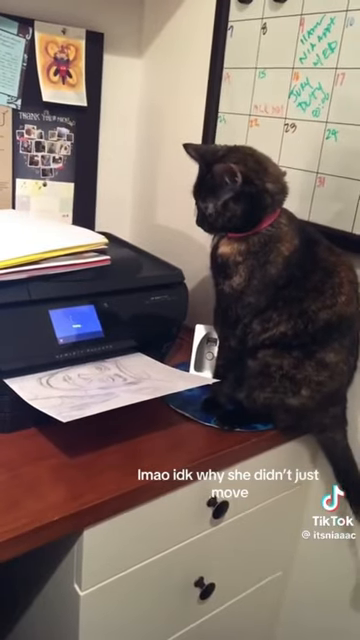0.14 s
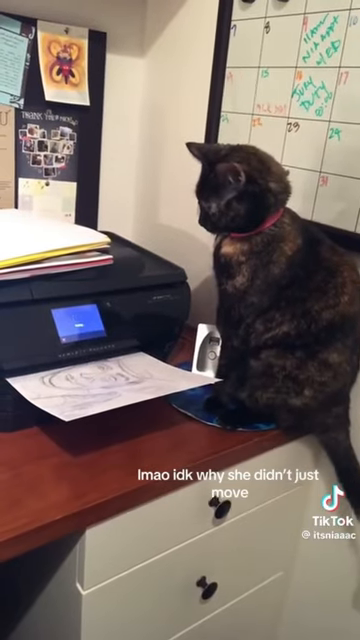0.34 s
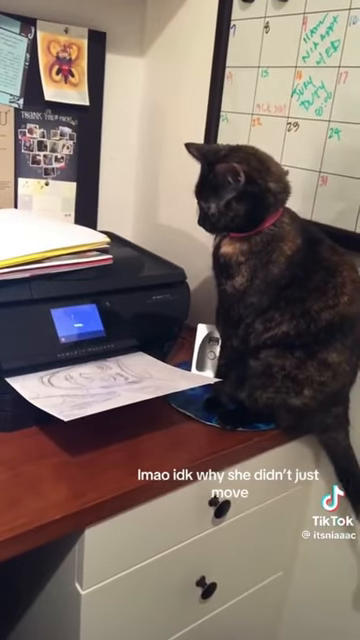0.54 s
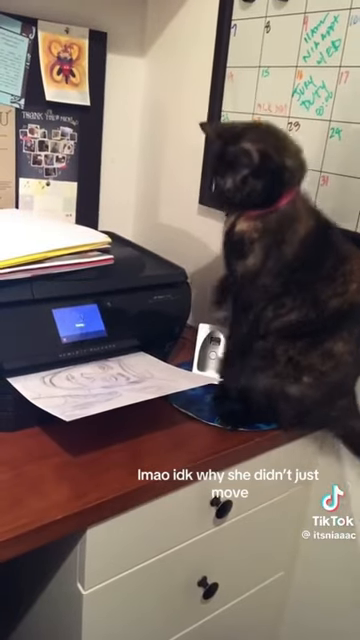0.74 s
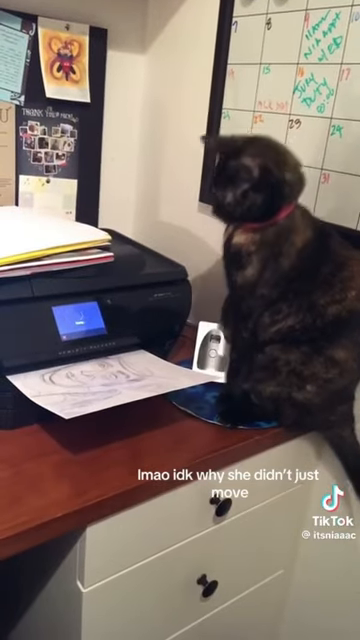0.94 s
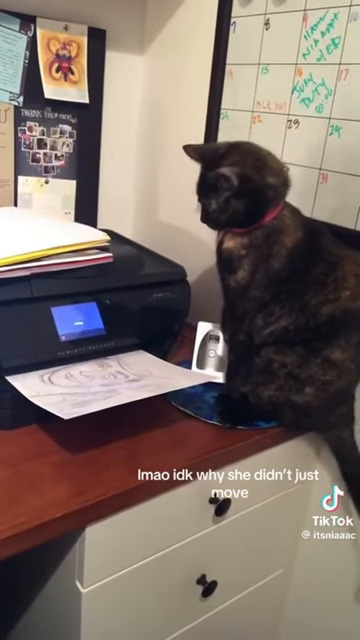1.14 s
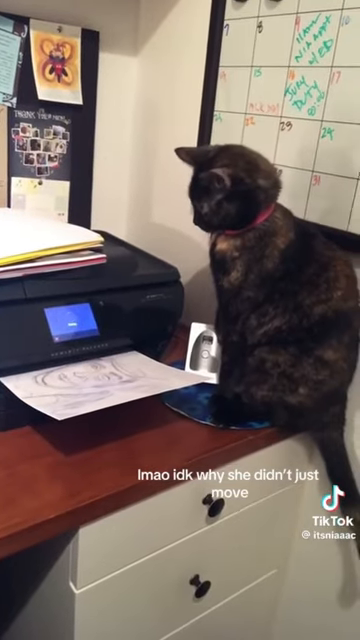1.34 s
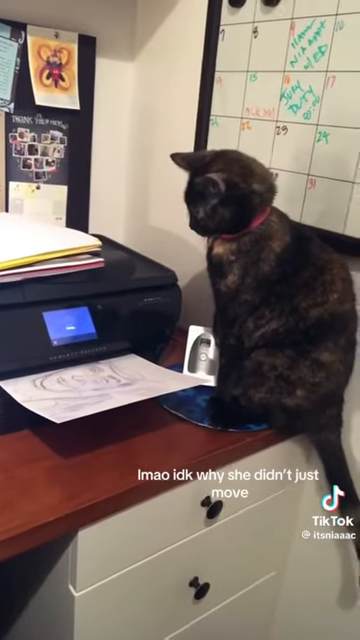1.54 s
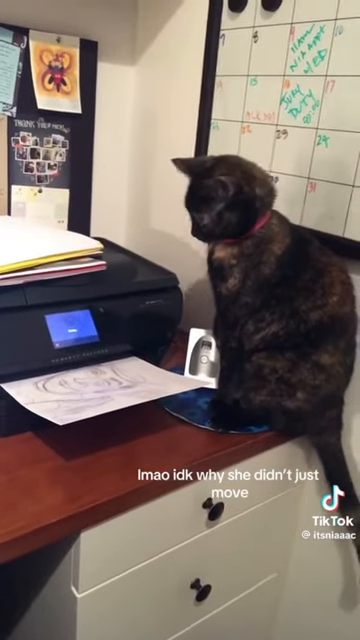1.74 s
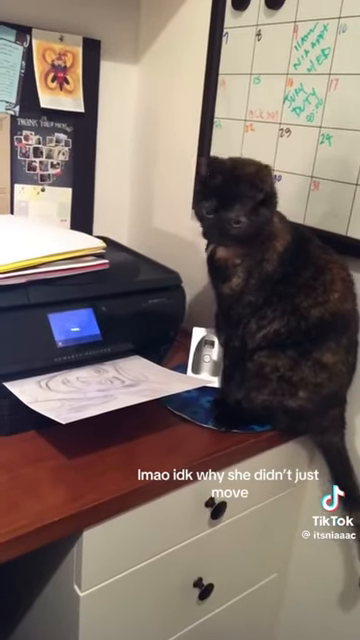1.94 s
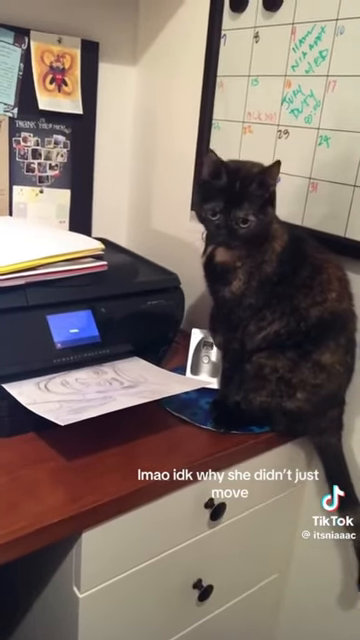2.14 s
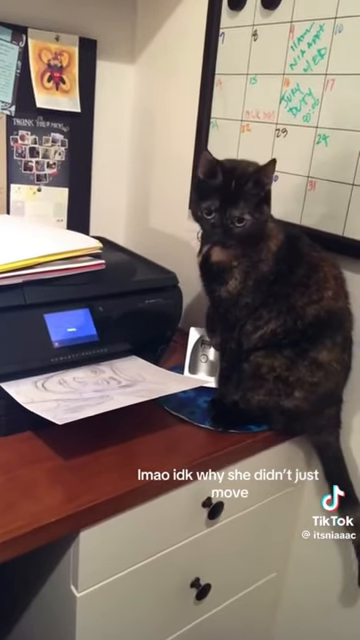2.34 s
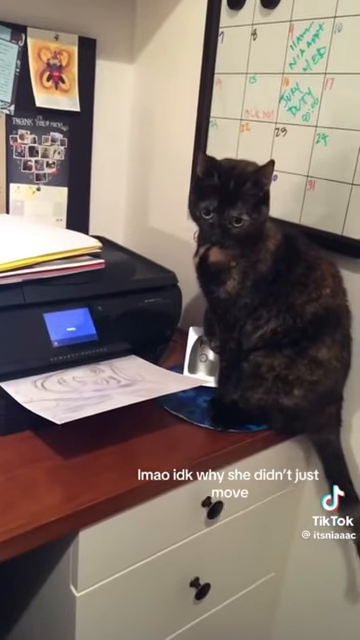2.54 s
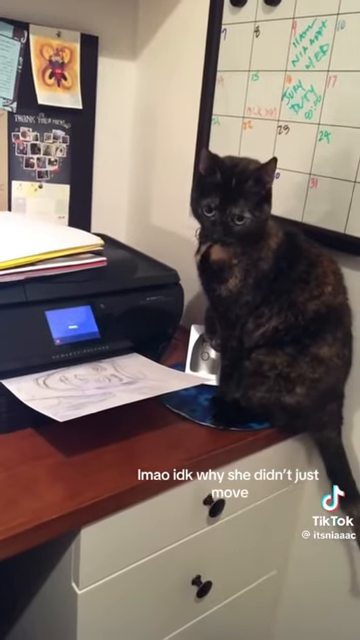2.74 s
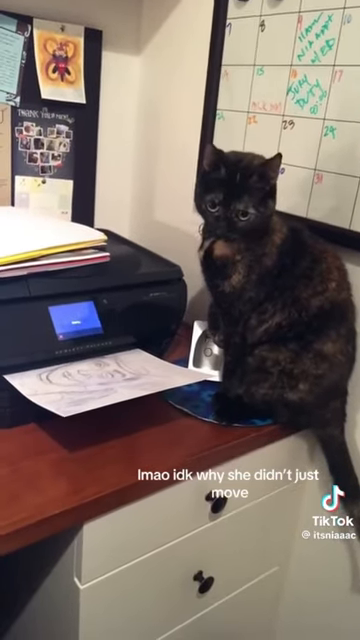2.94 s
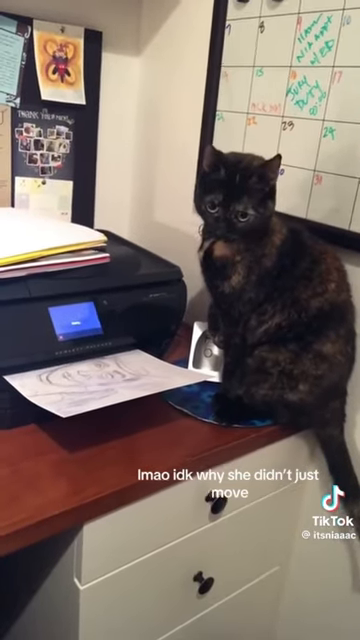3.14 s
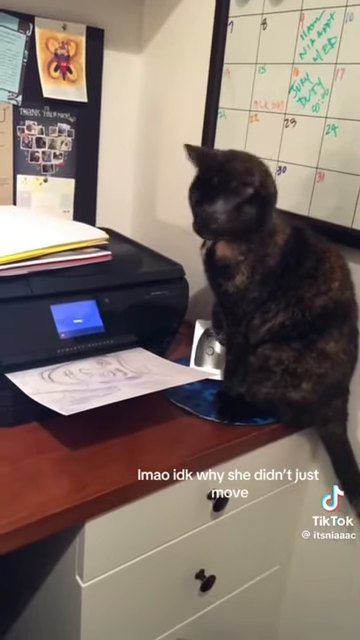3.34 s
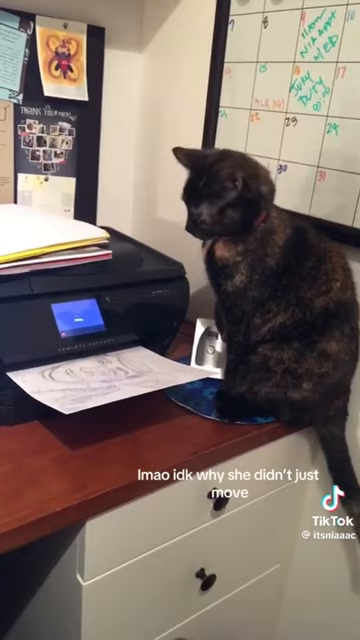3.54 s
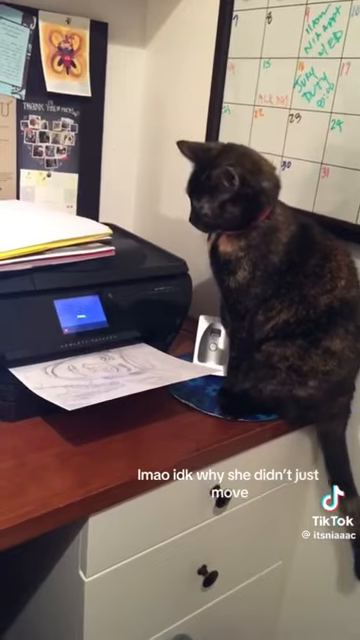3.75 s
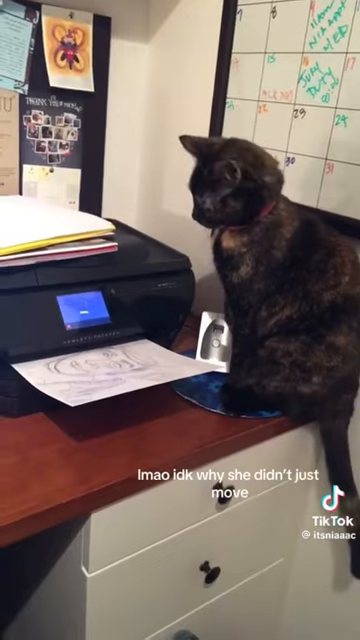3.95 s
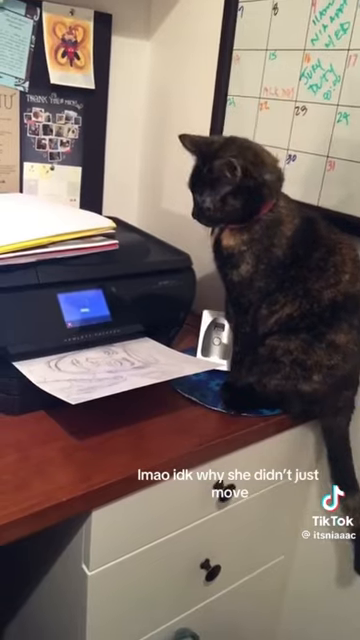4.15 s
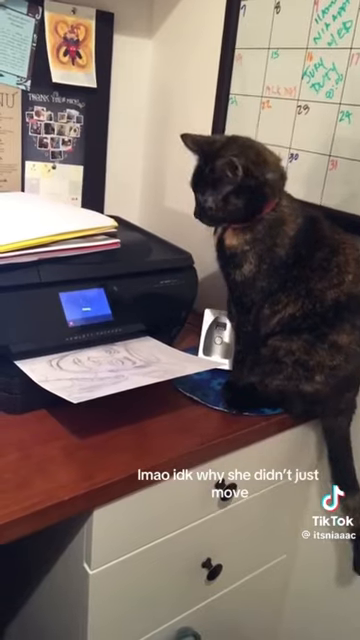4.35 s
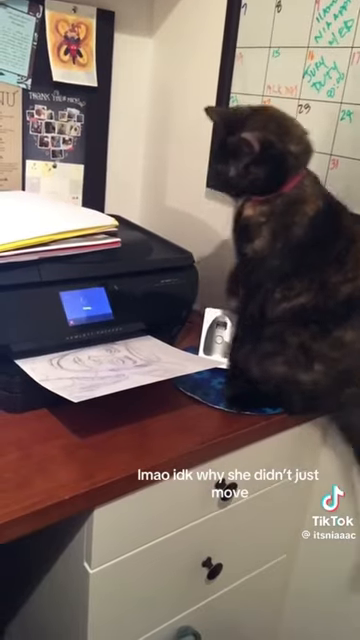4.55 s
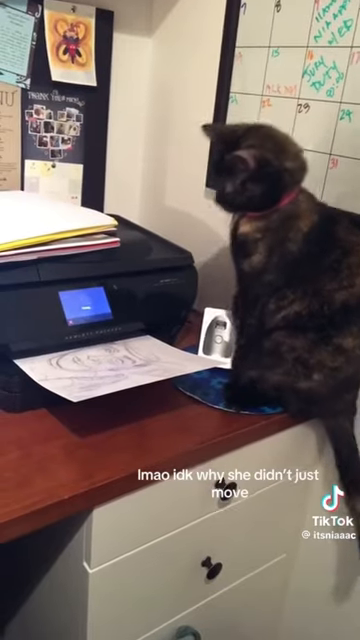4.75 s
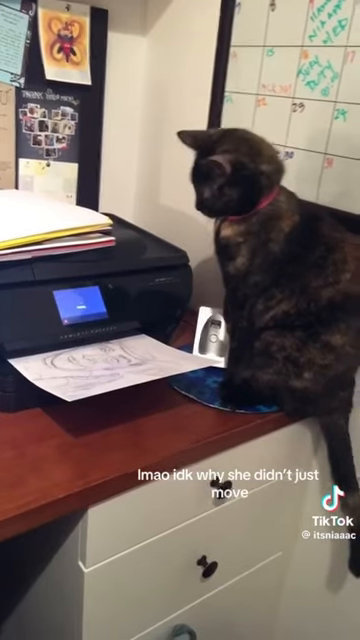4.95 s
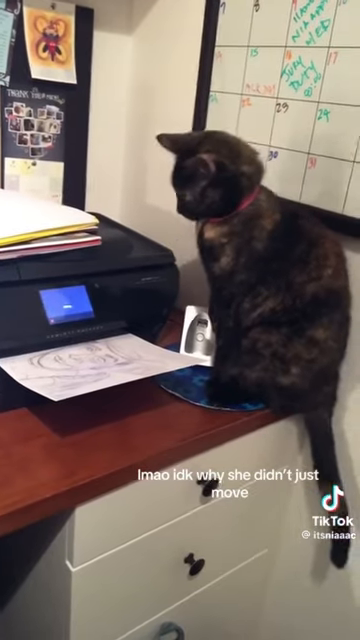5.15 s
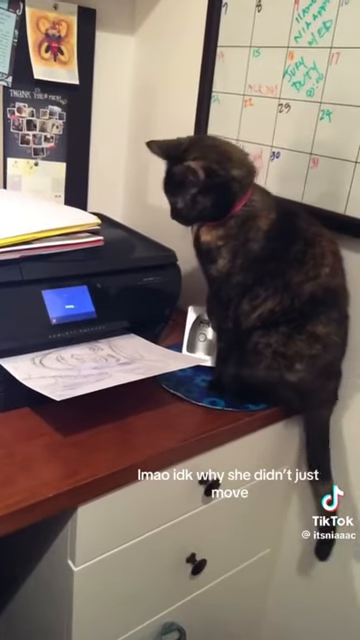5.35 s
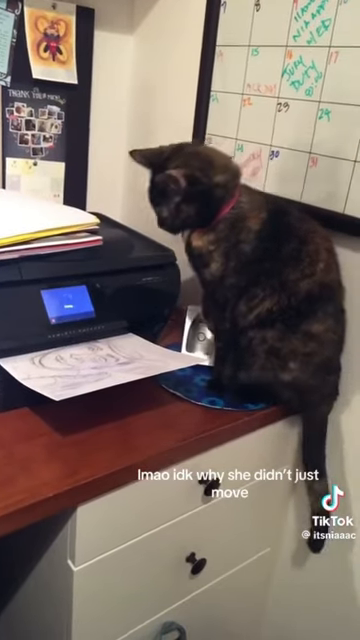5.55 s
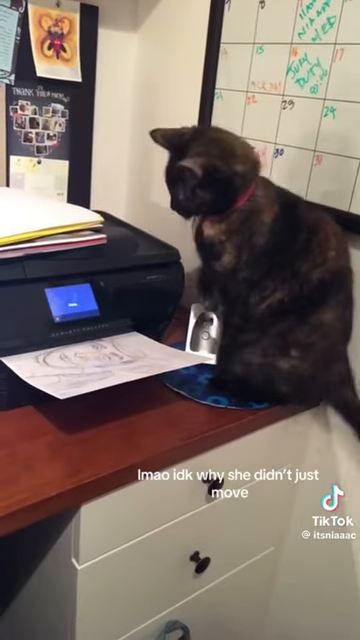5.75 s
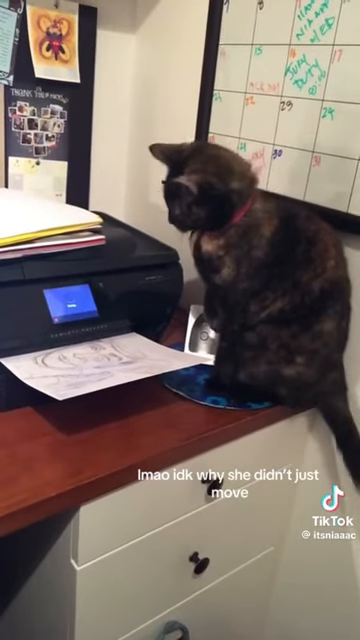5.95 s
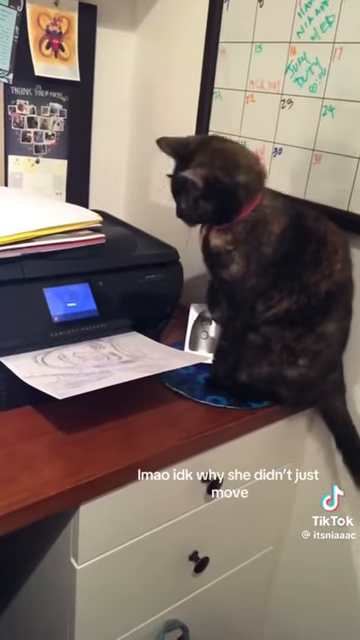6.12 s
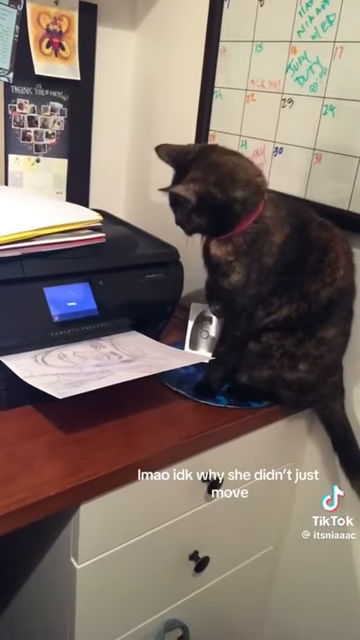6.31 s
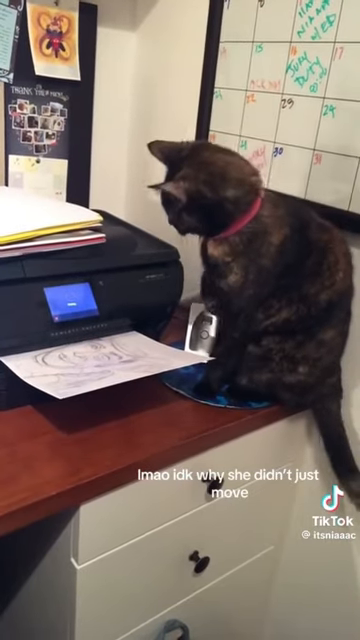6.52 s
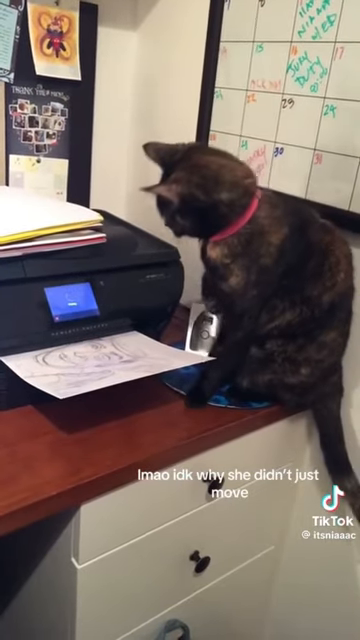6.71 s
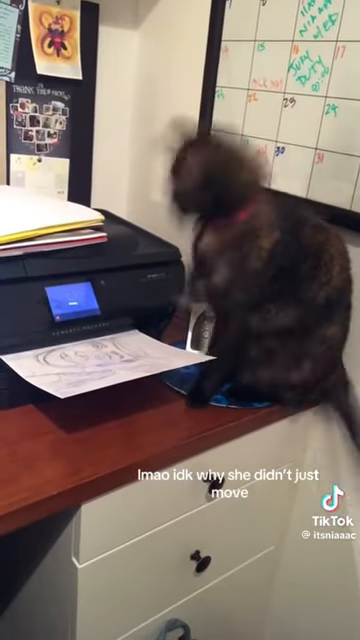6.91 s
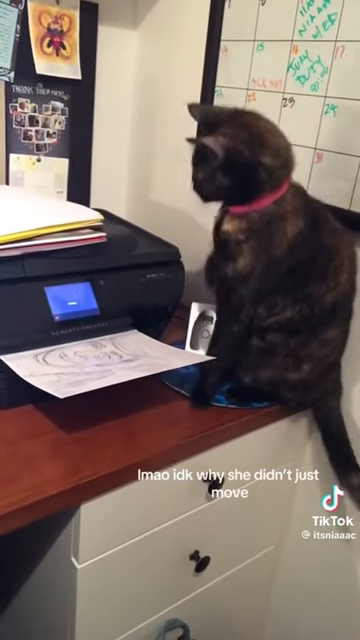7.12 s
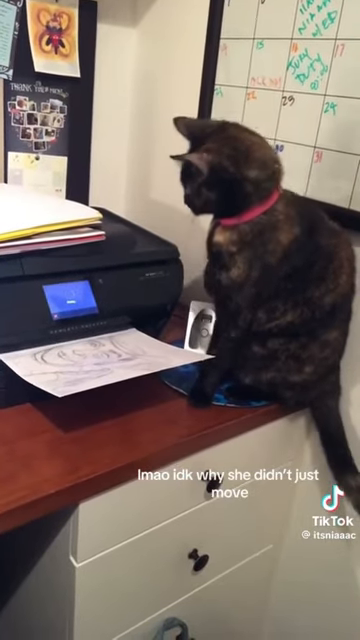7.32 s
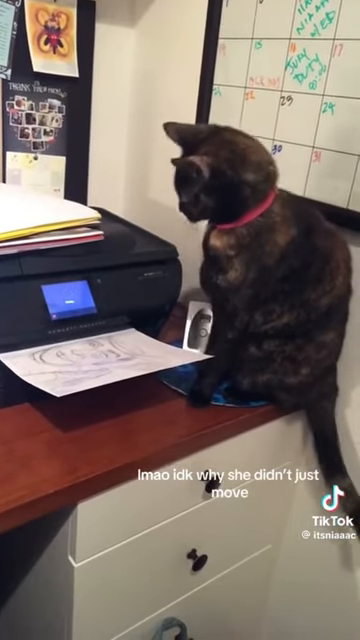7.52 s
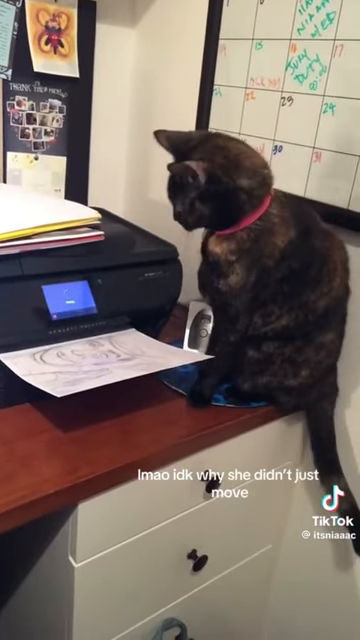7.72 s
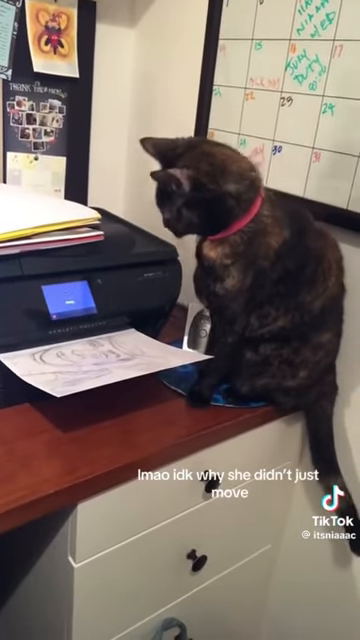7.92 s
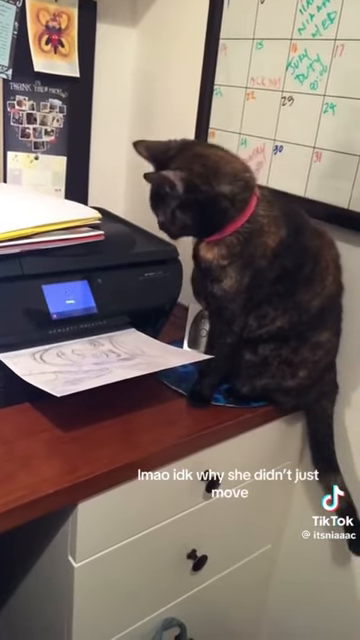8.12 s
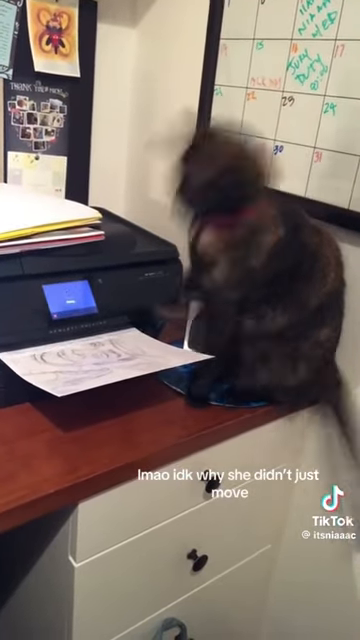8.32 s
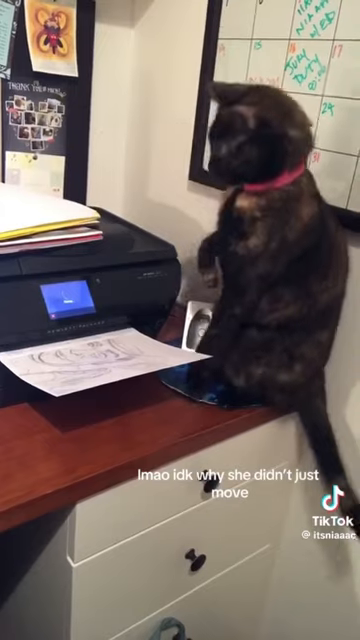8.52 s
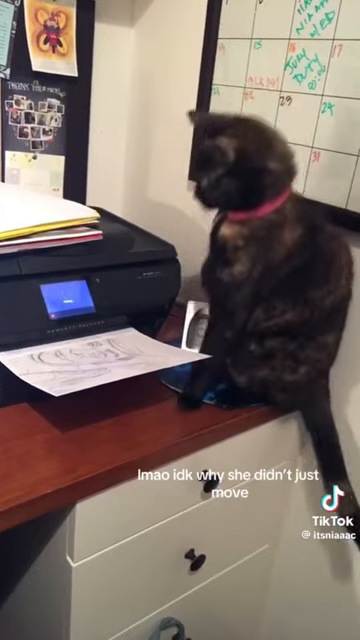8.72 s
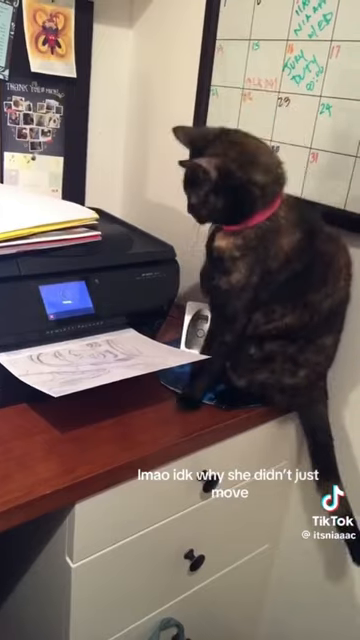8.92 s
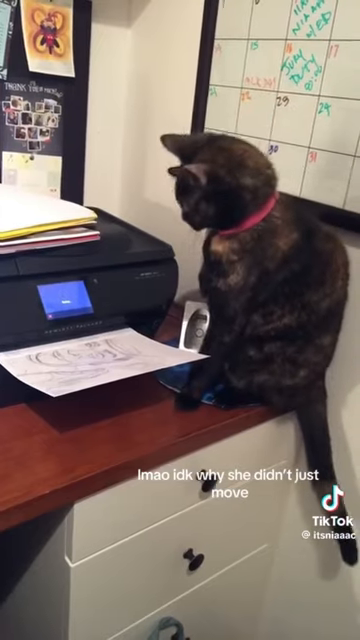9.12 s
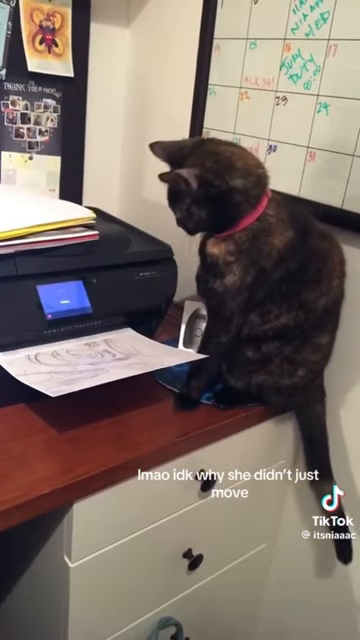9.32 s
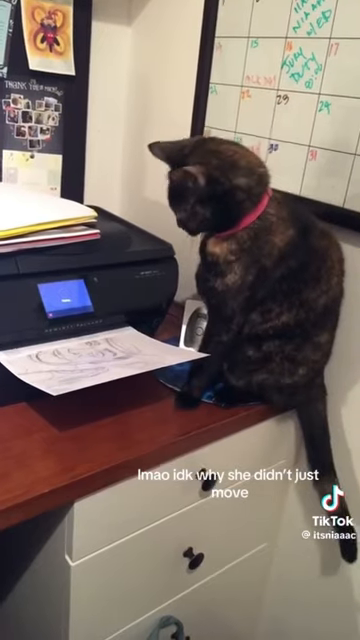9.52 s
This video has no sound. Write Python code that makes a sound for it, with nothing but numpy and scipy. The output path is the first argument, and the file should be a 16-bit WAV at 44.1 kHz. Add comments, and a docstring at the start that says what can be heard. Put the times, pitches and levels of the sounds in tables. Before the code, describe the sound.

Close, dry sound of an inkjet printer on a desk in a small room, with faint hiss and low hand rumble on the microphone. Quiet until a tiny tick at 0.55 s, then feeds begin at about 0.6, 1.9, 3.1, 4.4, 5.6, 6.8, 8.3 and 9.5 s. Each is a short, toothy gear rasp with a low plastic shudder, followed at once by a carriage sweep of roughly 0.3 s out and slightly less back: low rolling hum, rail hiss, thin motor whine stronger on the return, and a braking growl at each end. The desk booms most at 0.6, 4.4 and 8.3 s. Gritty scraping at 2.25-2.5 s ends in squeaks and a sharp click; a fainter scrape and squeak comes near 4.6 s. Barely audible, very high collar tinkles occur near 0.7, 4.5, 7 and 8.4 s, with soft bumps throughout.

```python
"""Inkjet printer and a cat

An inkjet printer works on a desk in a small room: the paper feed rasps and shakes the case,
then the carriage whirs across and back. Scrapes and squeaks come from the paper path.
The desk booms under it. A cat flinches at some feeds and its collar tag tinkles; the hand-held microphone rumbles.
Noise shaped by frequency makes the rubbing sounds; sine waves make the whine, hum, boom, squeaks and tinkles."""
import sys
import numpy as np
from scipy import signal
from scipy.fft import rfft, irfft, next_fast_len
from scipy.io import wavfile
from scipy.ndimage import map_coordinates

SR = 44100
rng = np.random.default_rng(int(sys.argv[2]) if len(sys.argv) > 2 else 0)


def to_wav(sig):
    """Store sig (one row per channel, or 1-D mono) as 16-bit WAV at the path in sys.argv[1].

    Samples outside -1..1 are clipped; the rate is SR.
    """
    pcm = np.clip(np.atleast_2d(sig), -1, 1) * 32767
    pcm = np.round(pcm).astype(np.int16)
    wavfile.write(sys.argv[1], SR, pcm.T)  # frames by channels


N = 426447
TIME = np.arange(N) / SR  # seconds

# All levels in the tables are relative: later steps balance the layers.
# print cycles, each a paper feed and then a carriage sweep out and back:
# (time [s], gear rasp [dB], gear squeak [dB], case shudder [dB], desk boom [dB], outward sweep [s])
PRINT_CYCLES = [(0.602, -32, -45, -27.5, -30, 0.27), (1.870, -30, -38, -26.5, -41, 0.28),
                (3.102, -31, -39, -26.5, -48, 0.31), (4.358, -33, -36.5, -28.5, -27.5, 0.31),
                (5.592, -32, -40.5, -27, -46, .31), (6.845, -30.5, -47, -25, -35, .28),
                (8.256, -30, -55, -25.5, -25.5, 0.28), (9.513, -30.5, -44, -26, -38, .28)]
# ringing tones of the case: (frequency [Hz], level [dB])
CASE_MODES = [(118, -34), (218, -50), (260, -41), (303, -46), (344, -36.5), (372, -42), (432, -48.5),
              (533, -50.5), (646, -49)]
# grinding gears: (frequency [Hz], level [dB])
GEAR_SPECTRUM = [(120, -15), (200, -9), (357, -14.5), (433, -7), (534, -5.5), (601, -22), (667, -10),
                 (822, -21.5), (1030, -17), (1680, -16.5), (2620, -16), (3530, -22), (4900, -27),
                 (6400, -23), (7000, -33), (9100, -66), (15400, -120)]
# resonances of the plastic panels: (frequency [Hz], width [Hz], level [dB])
PANEL_MODES = [(893, 30, -1.5), (1026, 22, 5.5), (1198, 20, -1), (1278, 33, -0.5), (1427, 76, -6),
               (1950, 23, -7), (2127, 18, 2), (2257, 13, 2.5), (2573, 47, -2), (2627, 95, 2.5),
               (2690, 100, -10), (2940, 25, -11), (3050, 23, -3.5), (3286, 57, -10), (4102, 117, -7),
               (6450, 75, -10.5)]
# resonance of dry gear flanks: (frequency [Hz], width [Hz], level [dB])
FLANK_MODES = [(2720, 580, 0)]
# sliding sheet: (frequency [Hz], level [dB])
PAPER_SPECTRUM = [(5000, -30), (7000, -22), (8000, 5), (10500, 1), (15500, -3)]
# overtones of the motor whine: (multiple of the whine [ratio], level [dB])
WHINE_OVERTONES = [(2, 1), (3, 1), (4, -4), (5, -4), (6, -2)]
# belt hum: (multiple of the tooth rate [ratio], level [dB])
BELT_PARTIALS = [(.5, -9), (1, 1), (2.5, -9)]
# slider hissing on its rail: (frequency [Hz], level [dB])
RAIL_SPECTRUM = [(680, -11), (1150, 1), (1510, -9.5), (1680, -22), (1980, -4.5), (2520, -6.5), (3040, -7.5),
                 (3410, -16), (3990, -10.5), (4530, -26), (5880, -6), (7170, -18), (14000, -25.5)]
# resonances of the rail: (frequency [Hz], width [Hz], level [dB])
RAIL_RESONANCES = [(893, 49, 8.5), (1967, 180, 8), (2850, 190, -3.5), (4160, 200, 0.5), (5330, 170, -9.5),
                   (6180, 420, -19)]
# low rolling of the carriage: (frequency [Hz], level [dB])
ROLL_SPECTRUM = [(41, -37), (70, -23), (113, 5), (140, -3.5), (172, 5.5), (204, -6.5), (280, -6.5),
                 (680, -21), (800, -36), (1040, -62), (1760, -120)]
# braking growl, also the noise in the case shudder: (frequency [Hz], level [dB])
BRAKE_SPECTRUM = [(47, -37), (80, 1), (161, -1.5), (270, -2), (374, -11), (472, -9.5), (776, -21.5),
                  (1000, -37), (1300, -55), (2200, -120)]
# swells of rubbing in the paper path: (time of peak [s], level [dB], half length [s])
SCRAPE_SWELLS = [(2.253, -42.5, 0.038), (2.337, -34.5, 0.025), (2.379, -29.5, 0.018), (2.496, -47, 0.075),
                 (4.58, -51.5, 0.082), (4.70, -51.5, 0.067), (7.95, -76, 0.11), (9.354, -59.5, 0.077)]
# the rubbing itself: (frequency [Hz], level [dB])
SCRAPE_SPECTRUM = [(88, -29), (150, -9), (318, -1.5), (416, -5.5), (545, -2), (772, -14.5), (918, -11.5),
                   (1180, -9), (2500, -12.5), (3400, -21), (5950, -21), (9000, -32.5), (15000, -39)]
# squeaks in the paper path: (time [s], frequency [Hz], level [dB], hold [s], time to fall 60 dB [s])
SCRAPE_SQUEAKS = [(2.405, 905, -43, 0.15, 0.22), (2.47, 1500, -51, 0.043, 0.12),
                  (2.497, 1560, -38, 0.01, 0.052), (2.508, 3565, -54, 0.027, 0.073),
                  (4.57, 906, -52.5, .05, 0.36)]
# tones of the collar tag: (time [s], frequency [Hz], level [dB], hold [s], time to fall 60 dB [s])
TAG_TINKLES = [(.733, 14100, -58, 0.011, 0.13), (4.5, 13950, -53, 0.029, 0.092),
               (6.975, 14000, -68, .01, 0.25), (7.055, 13950, -59, .015, 0.15),
               (8.385, 9000, -59, .015, .15), (8.39, 14000, -62, 0.046, .2), (8.41, 9600, -67, 0.025, .2)]
# small plastic ticks: (time [s], level [dB])
PLASTIC_TICKS = [(0.546, -61), (1.591, -59), (2.503, -40.5), (6.726, -65)]
# sound of a tick: (frequency [Hz], level [dB])
TICK_SPECTRUM = [(200, -23), (800, 7), (1600, 11), (2400, -2), (4000, 6), (7000, -4), (9000, -47),
                 (15000, -33)]
# bumps of the hand on the microphone: (time [s], level [dB])
HAND_BUMPS = [(.07, -44.5), (.66, -39), (.78, -44), (2.11, -38.5), (2.83, -38.5), (3.552, -38.5),
              (4.43, -35), (6.92, -37.5), (8.30, -36), (9.379, -39)]
# rumble of the hand: (frequency [Hz], level [dB])
HAND_SPECTRUM = [(11, -38), (22, 7), (34, 9), (53, 3.5), (75, -13), (85, -6.5), (110, -40), (190, -120)]
# room tone and microphone hiss: (frequency [Hz], level [dB])
QUIET_SPECTRUM = [(40, -19), (80, -37), (115, -2.5), (160, -14), (215, -13.5), (270, -12), (400, -23),
                  (630, -21), (900, -29), (2000, -30.5), (4500, -36.5), (15500, -38.5)]
# echo of the room: (frequency [Hz], time to fall 60 dB [s])
ROOM_DECAY = [(120, 0.45), (1000, 0.22), (4000, 0.21), (12000, 0.21)]

WHINE_HZ, BELT_HZ = 1020, 171.8  # motor whine and belt tooth rate around full speed
SWEEP_DELAY_S, TURN_S = .099, .014  # from feed to sweep; pause at the far end
RETURN_SAVES_S = .025  # the way back is this much shorter
WHINE_OUT_DB, WHINE_BACK_DB = -66.5, -55  # the motor sings louder on the way back
RUMBLE_OUT_DB, RUMBLE_BACK_DB = -45, -48.5  # the slider rumbles more on the way out
HISS_DB, GROWL_DB = -59, 3  # drive of the hiss; braking growl over the rumble drive
QUIET_DB = -62.5
TOP_HZ = 15550  # band limit of the recorder


def paper_feed(tooth_hz=118, slap_db=2, slap_decay_s=0.0026, panel_db=-4.5, grind_db=0.0, paper_db=-22,
               wander_rad=0.73, shudder_db=-1.0, fill_db=-22, engage_db=-17):
    """Gear teeth engage, then slap and grind as the roller jerks the sheet forward; the case shakes and rings on."""
    t = np.arange(SR // 4) / SR
    engage = amp(engage_db) * amp(-60 * t / 0.013)
    effort = envelope(t, attack=0.028, hold=0.022, t60=0.11) + engage
    shaking = envelope(t, attack=0.048, hold=0.022, t60=0.13)
    slide, rasp, squeak, shake, case = np.zeros((5, N))
    for s, rasp_db, squeak_db, case_db, _, _ in PRINT_CYCLES:
        drive = amp(rasp_db) * effort
        # whole part: which tooth; fraction: how far past its slap
        tooth, since = np.divmod(t * tooth_hz * (1 + 0.02 * rng.standard_normal()), 1)
        force = amp(slap_db + 2 * rng.standard_normal(size=64))  # uneven tooth strikes
        slaps = force.take(tooth.astype(int), mode="wrap") * np.exp(-since / tooth_hz / slap_decay_s)
        teeth = unit(1 + slaps)
        add(slide, s, drive)
        add(rasp, s, drive * teeth)
        add(squeak, s, amp(squeak_db) * effort * teeth)
        swell = amp(case_db) * shaking
        modes = np.zeros(len(t))
        for hz, db in CASE_MODES:
            phase = 2 * np.pi * (hz * t + rng.random()) + wander_rad * wobble(44.0, size=len(t))
            modes += amp(db) * np.sin(phase)
        add(case, s, swell * unit(modes))
        add(shake, s, swell)
    grinding = amp(grind_db) * coloured(noise(), GEAR_SPECTRUM)
    panels = amp(panel_db) * resonant(noise(), PANEL_MODES)
    gears = rasp * (grinding + panels)
    sheet = slide * amp(paper_db) * coloured(noise(), PAPER_SPECTRUM)
    # filtered twice for a narrower squeak
    flanks = squeak * resonant(resonant(noise(), FLANK_MODES), FLANK_MODES)
    shudder = amp(shudder_db) * case + amp(fill_db) * shake * coloured(noise(), BRAKE_SPECTRUM)
    return gears + flanks + sheet, shudder


def carriage(overtone_db=-8, belt_db=-4.5, roll_db=-5, rail_db=-4.0, modes_db=-3.5, brake_db=-3,
             judder_db=-9, rattle_db=-23, waver_db=2):
    """Motor whine and belt hum follow the speed; the slider hisses on its rail and judders as it brakes."""
    speed, whine, hiss, rumble, growl, chafe = travel()
    uneven_speed = speed * (1 + .004 * wobble(110) + .003 * wobble(12))
    turn = 2 * np.pi * np.cumsum(uneven_speed) / SR  # times a pitch in Hz, this is its phase

    def stack(hz, orders):
        """Sine waves at multiples of one pitch, each wavering in level."""
        return unit(sum(amp(db + 3.4 * wobble(20)) * np.sin(k * hz * turn) for k, db in orders))

    uneven = 1 + .18 * wobble(260)
    cruise = speed ** 10  # the overtones sing only near full speed
    tone = unit(amp(waver_db * wobble(30)) * np.sin(WHINE_HZ * turn))
    overtones = hiss * cruise * amp(overtone_db) * stack(WHINE_HZ, WHINE_OVERTONES)
    motor = uneven * (whine * tone + overtones)
    sliding = grains(6000) * (1 + 0.1 * np.sin(BELT_HZ * turn))  # each belt tooth tugs the slider
    rail = amp(rail_db) * coloured(sliding, RAIL_SPECTRUM)
    rail += amp(modes_db) * resonant(sliding, RAIL_RESONANCES)
    body = amp(belt_db) * stack(BELT_HZ, BELT_PARTIALS)
    body += amp(roll_db) * coloured(noise(), ROLL_SPECTRUM)
    judder = amp(brake_db) * coloured(noise(), BRAKE_SPECTRUM)
    judder += amp(judder_db) * speed * stack(BELT_HZ, [(2, 3.5), (3, -4.0)])
    judder += amp(rattle_db) * rail
    bite = resonant(noise(), [(1850, 40, -1.2), (942, 115, -1.1)])
    return motor, hiss * rail + rumble * body + growl * judder + chafe * bite


def travel(speed_up_s=.045, slow_down_s=.075, growl_lag_s=0.0012, growl_width_s=0.053,
           chafe_lead_s=0.053, chafe_width_s=0.027, chafe_db=-56.0):
    """Carriage speed over time, and the level of each sound that its motion drives."""
    speed, whine, hiss, rumble, growl, chafe = np.zeros((6, N))
    t = np.arange(SR // 2) / SR
    for start, length, whine_db, rumble_db in passes():
        left = length - t
        ramp = np.clip(np.minimum(t / speed_up_s, left / slow_down_s), 0, 1)
        v = np.sin(ramp * np.pi / 2)
        add(speed, start, np.sqrt(v))
        add(whine, start, amp(whine_db) * v ** 4)
        add(hiss, start, amp(HISS_DB) * v ** 1.7)
        add(rumble, start, amp(rumble_db) * v ** .5)
        braking = np.exp(-((left + growl_lag_s) / growl_width_s) ** 2)
        add(growl, start, amp(rumble_db + GROWL_DB) * braking)
        # the belt bites early in the braking
        biting = np.exp(-((left - chafe_lead_s) / chafe_width_s) ** 2)
        add(chafe, start, amp(chafe_db) * biting)
    return np.minimum(speed, 1), whine, hiss, rumble, growl, chafe


def passes():
    """After each feed the carriage runs out, turns and runs back: (start [s], length [s], whine [dB], rumble [dB])."""
    rows = []
    for s, *_, sweep in PRINT_CYCLES:
        start = s + SWEEP_DELAY_S
        rows.append((start, sweep, WHINE_OUT_DB, RUMBLE_OUT_DB))
        rows.append((start + sweep + TURN_S, sweep - RETURN_SAVES_S, WHINE_BACK_DB, RUMBLE_BACK_DB))
    return rows


def boom(start_hz=135, sag_per_s=3.8, delay_s=.07, rise_s=0.012, t60=0.4, boom_db=1):
    """Soon after each feed starts the desk booms, sinking in pitch as the roller runs down."""
    out, t = np.zeros(N), np.arange(SR // 2) / SR
    phase = 2 * np.pi * np.cumsum(start_hz * np.exp(-sag_per_s * t)) / SR
    for s, _, _, _, db, _ in PRINT_CYCLES:
        level = amp(db + boom_db - 60 * t / t60) * (1 - np.exp(-t / rise_s))
        add(out, s + delay_s, level * np.sin(phase + 2 * np.pi * rng.random()))
    return out


def scrapes(scrape_db=-1, catch_db=2):
    """Gritty rubbing made of tiny contacts, which swells, catches and slips."""
    level = sum(amp(db) * np.exp(-((TIME - s) / width) ** 2) for s, db, width in SCRAPE_SWELLS)
    catching = amp(scrape_db + catch_db * wobble(110))
    return level * catching * coloured(grains(12000), SCRAPE_SPECTRUM)


def ticks(t60=0.067):
    """Light plastic contacts: bursts of noise that die quickly."""
    level, t = np.zeros(N), np.arange(SR // 4) / SR
    for s, db in PLASTIC_TICKS:
        add(level, s, amp(db - 60 * t / t60))
    return level * coloured(noise(), TICK_SPECTRUM)


def rings(table, rise_s=0.0067, waver_rad=0.45):
    """Squeaks or tinkles: single tones that are driven for a moment and then ring out."""
    out, t = np.zeros(N), np.arange(SR // 2) / SR
    for s, hz, db, hold, t60 in table:
        level = amp(db - 60 * np.maximum(t - hold, 0) / t60) * (1 - np.exp(-t / rise_s))
        add(out, s, level * np.sin(2 * np.pi * hz * t + waver_rad * wobble(80, size=len(t))))
    return out


def room(x):
    """The walls' answer: a noise tail in which each frequency dies at its own speed."""
    hz, t, z = signal.stft(rng.standard_normal(SR // 2), SR, nperseg=256)
    fading = amp(-60 * t / along(ROOM_DECAY, hz)[:, None])
    tail = signal.istft(z * fading, SR, nperseg=256)[1]
    late = np.pad(x, (SR // 250, 0))  # the answer starts 4 ms late
    return signal.fftconvolve(late, tail / np.linalg.norm(tail))[:N]


def background(tremor_db=-54.5, swell_db=4):
    """Room tone and microphone hiss; the hand trembles on the microphone and now and then bumps it."""
    bumps = sum(amp(db) * envelope(TIME - s, attack=0.021, hold=0.0098, t60=0.49) for s, db in HAND_BUMPS)
    hand = amp(tremor_db + swell_db * wobble(11)) + bumps
    quiet = amp(QUIET_DB) * coloured(noise(), QUIET_SPECTRUM)
    return quiet + hand * coloured(noise(), HAND_SPECTRUM)


def amp(db):
    """Decibels to gain."""
    return np.exp(np.asarray(db) * (np.log(10) / 20))


def unit(x):
    """Scale x to an average (rms) level of 1."""
    return x / np.sqrt(np.mean(x ** 2) + 1e-20)


def along(points, hz):
    """Read a curve of (frequency [Hz], value) points on a log frequency axis."""
    f, v = np.transpose(points)
    return np.interp(np.log(hz + 1), np.log(f + 1), v)


def wobble(rate, size=N):
    """A smooth random curve through a given number of random points a second."""
    coarse = np.arange(0, size + 64, 64)  # work out every 64th sample, join with lines
    knots = rng.standard_normal(int(size * rate / SR) + 4)
    return np.interp(np.arange(size), coarse, map_coordinates(knots, [coarse * rate / SR]))


def envelope(t, attack, hold, t60):
    """A straight rise, a hold and an even fall in dB, all timed in seconds."""
    return np.clip(t / attack, 0, 1) * amp(-60 * np.maximum(t - attack - hold, 0) / t60)


def filtered(x, response):
    """Scale each frequency of x by a response; spare length keeps the end off the start."""
    m = next_fast_len(N + SR // 8, True)
    return irfft(rfft(x, m) * response(np.fft.rfftfreq(m, 1 / SR)), m)[:N]


def coloured(x, spectrum):
    """Shape x by a spectrum, at rms 1."""
    return unit(filtered(x, lambda hz: amp(along(spectrum, hz))))


def resonant(x, modes):
    """Pass x through resonances side by side, at rms 1."""
    out = np.zeros(len(x))
    for k, (hz, width, db) in enumerate(modes):
        peak = signal.lfilter(*signal.iirpeak(hz, hz / width, SR), x)
        out += (-1) ** k * amp(db) * peak  # every other one is flipped
    return unit(out)


def noise():
    """White noise."""
    return rng.standard_normal(N)


def grains(rate):
    """Random tiny contacts, on average rate a second."""
    return unit(noise() * (rng.random(N) < rate / SR))


def add(track, s, x):
    """Mix x into the track at s seconds."""
    part = track[max(round(s * SR), 0):][:len(x)]
    part += x[:len(part)]


def scene(room_db=-7, tone_room_db=-17, printer_db=-0.62):
    """The printer with its room echo, then the squeaks, the cat's tag and the background."""
    gears, case = paper_feed()
    motor, slider = carriage()
    clatter = gears + slider + scrapes() + ticks()
    tones = case + motor
    walls = room(amp(room_db) * clatter + amp(tone_room_db) * tones)
    printer = amp(printer_db) * (clatter + tones + boom() + walls)
    return printer + rings(SCRAPE_SQUEAKS) + rings(TAG_TINKLES) + background()


def record(dry):
    """The recorder keeps nothing above its band limit."""
    return filtered(dry, lambda hz: hz < TOP_HZ)


dry = scene()
out = record(dry)
to_wav(out)
```